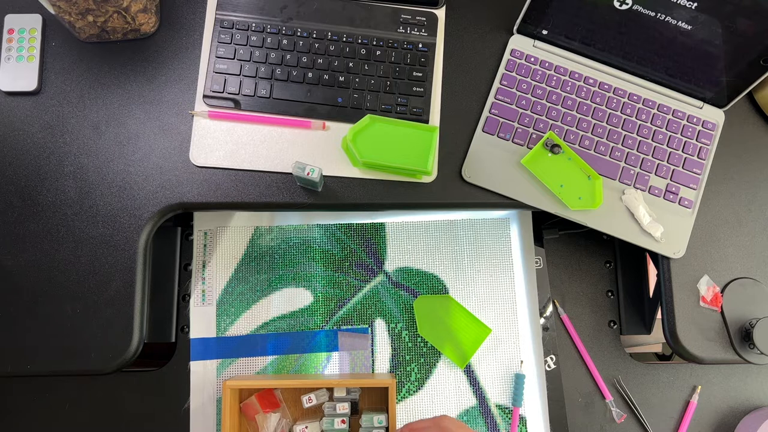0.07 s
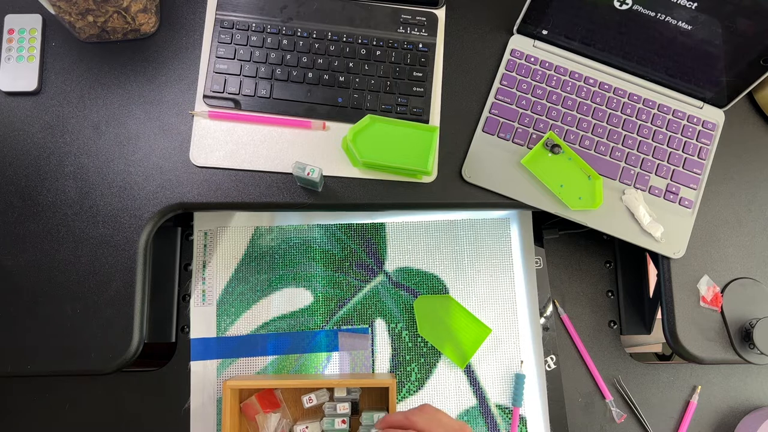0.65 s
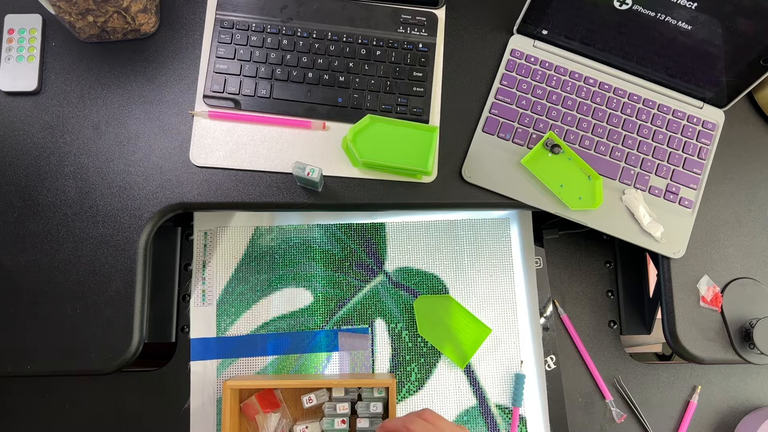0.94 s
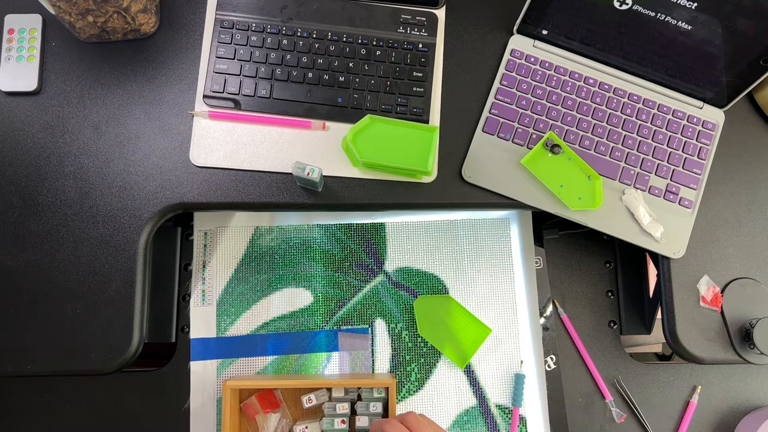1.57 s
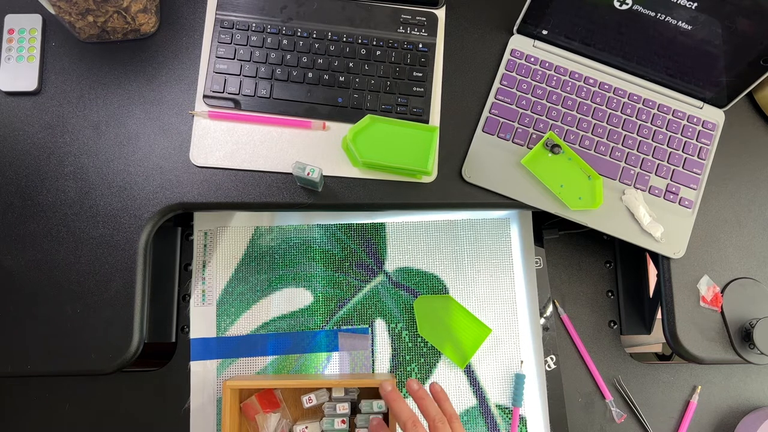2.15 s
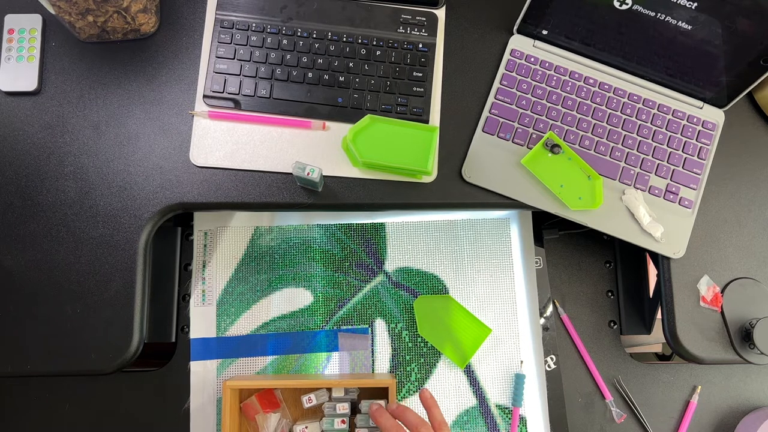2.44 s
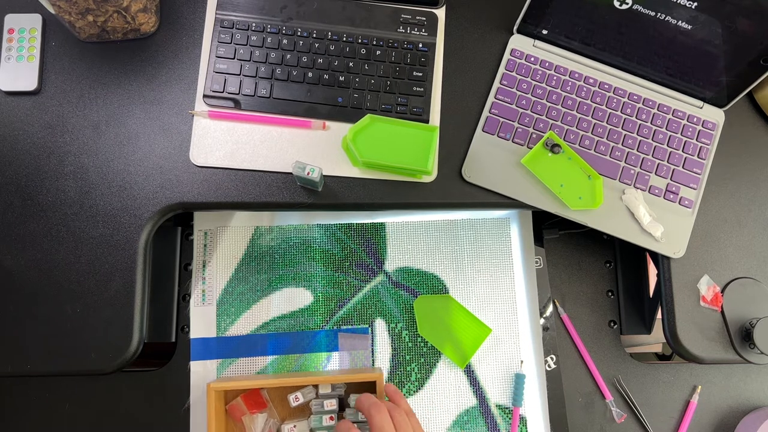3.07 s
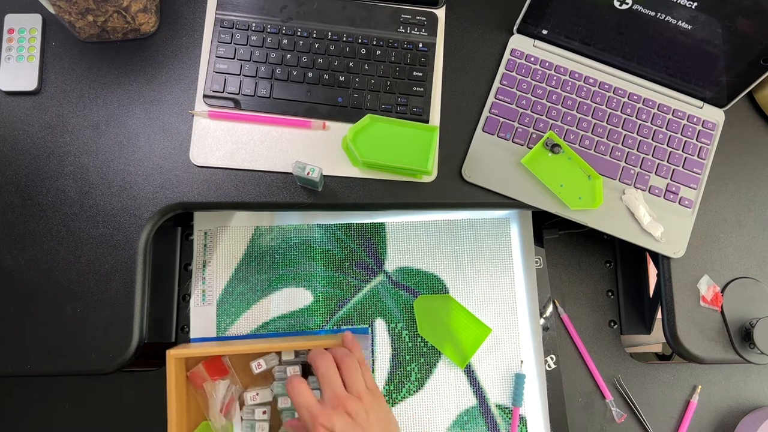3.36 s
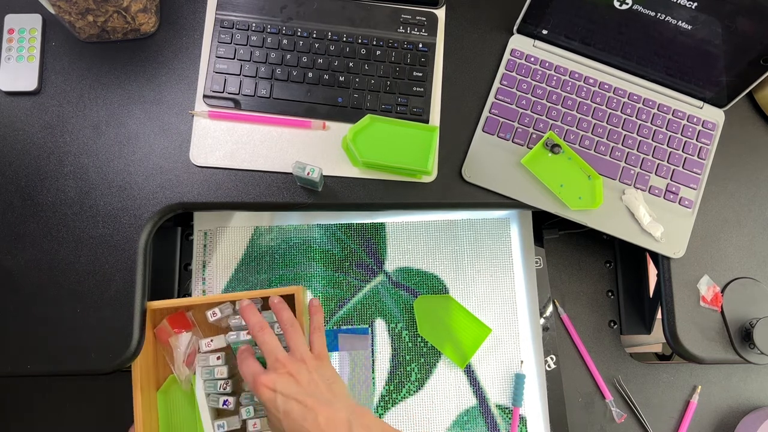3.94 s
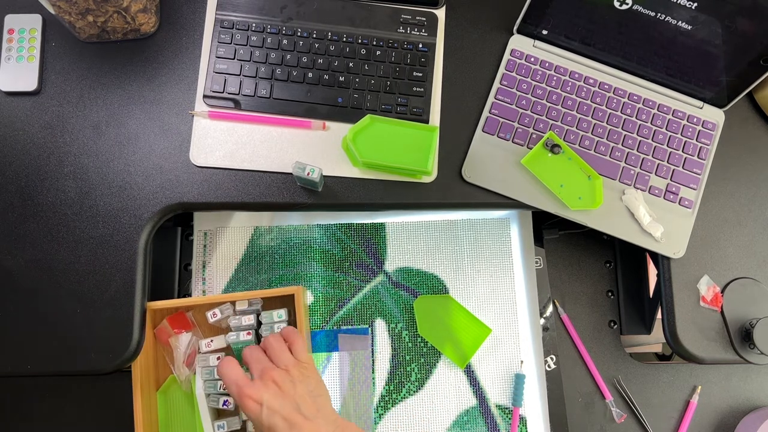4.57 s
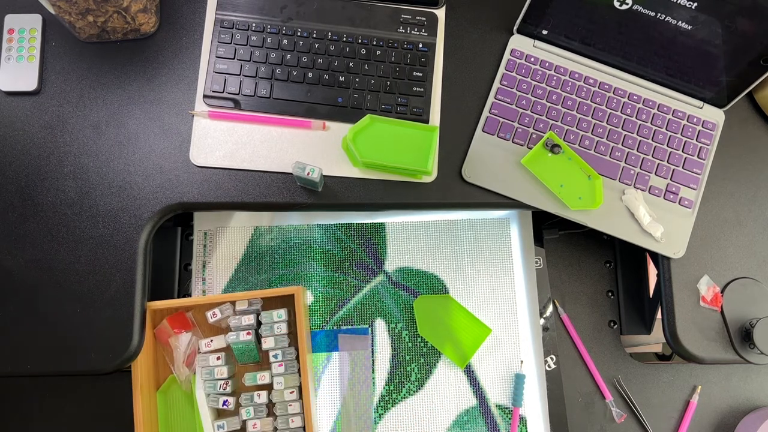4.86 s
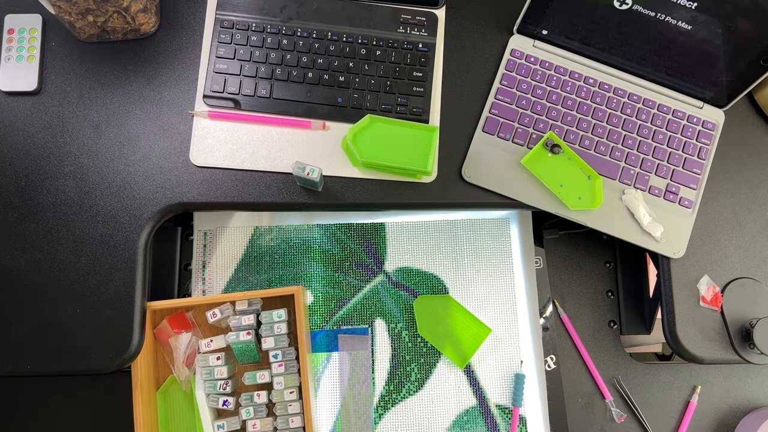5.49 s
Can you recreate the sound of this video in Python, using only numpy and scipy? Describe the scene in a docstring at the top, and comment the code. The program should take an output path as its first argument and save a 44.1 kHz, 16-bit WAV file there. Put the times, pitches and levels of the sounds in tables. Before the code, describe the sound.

Small plastic boxes are handled in a wooden tray on a desk, heard close up. A few faint ticks open, then a sharp cluster of dry knocks comes at about 0.8 seconds. More clicks and short scrapes follow, with a loud knock near 1.5 seconds. Lighter clicks come around 2.1 seconds and a firmer clatter at 2.7. From 3.2 seconds the boxes knock and rattle more busily. Between 3.7 and 3.9 the tray drags with a brief low groan and lands with a hollow bump. Scattered clicks continue until another loud knock at 4.6 seconds. From 4.8 to 5.1, fingertips press the boxes down with five light, dull taps, followed by one small crisp click. Fingers brush very faintly on the wood from about two seconds onward. A short small-room tail and a faint, steady low room tone lie behind everything.

```python
"""On a desk in a small room, a wooden tray full of small plastic bead boxes is pulled along, heard close up.
The boxes knock and chatter with a snap of thin walls, and stick and slip as they scrape past each other.
The tray groans as it drags and lands with a hollow bump; fingers brush the wood and press the boxes
into their rows with light, dull taps. A short room tail and a faint, steady room tone lie behind it."""
import sys
import numpy as np
from scipy import signal
from scipy.fft import rfft, irfft, next_fast_len
from scipy.io import wavfile

SR = 44100
rng = np.random.default_rng(int(sys.argv[2]) if len(sys.argv) > 2 else 0)


def unload_audio(sound):
    """Save the sound as a 16-bit wav file, at the path given as the first command line argument."""
    columns = np.transpose(np.atleast_2d(sound))
    # keep every value between -1 and 1, then stretch to whole-number steps
    steps = np.round(np.clip(columns, -1, 1) * 32767)
    wavfile.write(sys.argv[1], SR, steps.astype(np.int16))


N = 247842
HIT_SIZE, ATTACK_SIZE = int(.12 * SR), int(.008 * SR)
MEDIUM_DB, HARD_DB = -40, -26   # levels of a medium and a hard knock

# bright snap of the thin plastic walls: (frequency [Hz], level [dB])
WALL_SNAP = [(1800, -13.5), (2800, 2.5), (3900, 1), (5000, -3), (6500, -11.5), (9000, -23.5), (16000, -58)]
# crisp tick of the hard corners: (frequency [Hz], level [dB])
CORNER_TICK = [(4000, -26.5), (7000, 0), (8500, 0.5), (10000, -5.5), (12000, 1.5), (16000, -5.5)]
# soft hiss of rubbed wood: (frequency [Hz], level [dB])
WOOD_HISS = [(1000, -2.5), (2500, -1.5), (3500, -0.5), (4200, -3.5), (5000, -4.5), (6200, -10), (7700, -5),
             (9500, -10), (12000, -7.5), (16000, -12)]


def box_knocks(medium_chatter_ms=1.9, halving_db=18.5):
    """Boxes knock together: firm hits are crisp, light ones chatter for longer."""
    # (time [s], level [dB], pitch [Hz], wall snap [dB re level], corner tick [dB re level])
    knocks = [(0.185, -46, 1600, -25, -38), (0.196, -48.5, 1890, -10, -12), (0.2357, -55, 1490, -3, -11),
              (0.2938, -50.5, 1630, -4.5, -10), (0.3023, -48.5, 1350, -8, -14),
              (0.7653, -48.5, 950, -25, -28), (0.8161, -26, 1210, -13.5, -20),
              (0.8325, -26, 1630, -4, -16.5), (0.841, -24, 1600, -12, -16.5),
              (0.8511, -37.5, 1480, -3.5, -14), (1.0712, -49, 1400, -10, -16),
              (1.0914, -38.5, 1220, -16, -11.5), (1.215, -28, 1200, -7, -18.5),
              (1.2182, -29.5, 1190, -13, -35), (1.252, -45, 1400, -2, -21), (1.333, -49, 1770, -8.5, -20),
              (1.4015, -40.5, 1250, -12.5, -21.5), (1.4629, -33.5, 1630, -8, -27),
              (1.4733, -32, 1690, -1, -10), (1.484, -17.5, 1420, -7.5, -20.5), (2.063, -54, 1240, -10, -23),
              (2.1, -42.5, 1670, -2.5, -3), (2.1114, -42.5, 1360, -9, -5), (2.167, -51.5, 1450, -6, -8.5),
              (2.4427, -50, 1476, -2, -7), (2.6753, -38.5, 1520, -9, -18), (2.6805, -38, 1500, -19, -21),
              (2.684, -31, 1600, -14, -23), (2.7316, -31.5, 1700, -8, -23.5),
              (2.864, -45.5, 1450, -11, -10.5), (2.9416, -49.5, 1500, 1, -6), (2.9517, -41, 1320, -24, -22),
              (2.9681, -55.5, 1470, -2, 1), (2.984, -40.5, 1180, -10, -15),
              (3.0462, -39.5, 1340, -10, -19.5), (3.2441, -43.5, 1590, -4, -15.5),
              (3.2794, -34, 1300, -18, -27), (3.391, -48, 1390, -15, -25), (3.4354, -33, 1270, -41, -49),
              (3.4768, -40, 1260, -11.5, -24.5), (3.5318, -27, 1374, -19, -35),
              (3.549, -48, 1440, 6.5, -17), (3.6305, -26.5, 1316, -11, -23),
              (3.7528, -28.5, 1220, -15.5, -39), (3.769, -37, 1350, -22.5, -26),
              (3.8421, -28.5, 1470, -35, -31), (3.855, -27.5, 1400, -19.5, -36),
              (3.8737, -39, 1500, -19, -18), (3.9045, -32, 1330, -10.5, -34), (3.9345, -30, 1500, -12, -26),
              (3.9843, -57, 1580, 1.5, -6.5), (4.0151, -47.5, 1670, -27, -22),
              (4.0464, -29.5, 1480, -14, -49), (4.1239, -43.5, 1300, -7.5, -8),
              (4.208, -51.5, 1280, -3, -34), (4.3241, -45, 1550, -8, -29), (4.3412, -33, 1120, -5, -20.5),
              (4.3504, -40.5, 1670, -11, -24), (4.4694, -32.5, 1630, -15, -41.5),
              (4.5875, -43.5, 1090, -15, -14), (4.6094, -42, 1400, -2.5, -19.5),
              (4.6175, -19.5, 1270, -21, -33.5), (5.2104, -42, 1940, 1, -9), (5.4802, -61.5, 1664, -3, -7)]
    out = np.zeros(N)
    for s, db, pitch_hz, snap_db, tick_db in knocks:
        chatter_ms = medium_chatter_ms * .5 ** ((db - MEDIUM_DB) / halving_db)
        add(out, s, box_contact(db, pitch_hz, snap_db, tick_db, chatter_ms) + tray_thump(s, db))
    return out


def box_contact(db, pitch_hz, snap_db, tick_db, chatter_ms, knock_ms=.8, snap_ms=2.2, tick_ms=4.0,
                ring_db=-1.0, lid_db=-6.0):
    """A dry knock, damped by the neighbours, with a weaker ring, a snap of the walls and a corner tick."""
    # ring of the thin lids and walls: (frequency [Hz], level [dB], t60 [s])
    lid_modes = [(2578, -0.5, 0.053), (2825, 0.5, 0.05), (2960, -7, 0.0092), (3662, -1, 0.038),
                 (3826, 0, 0.033), (4370, 5, 0.022), (4540, -6, 0.018), (5400, -10.5, 0.022)]
    low_cut = signal.butter(2, 540, "high", fs=SR, output="sos")   # a small box has little bass
    octaves = .93 + .06 * max(db - HARD_DB, 0)   # the hardest blows excite a wider band
    force = burst(knock_ms + chatter_ms, rise_ms=0.71)
    knock = unit_hit(signal.sosfilt(low_cut, around_pitch(force, pitch_hz, octaves)))
    body = knock + from_db(ring_db) * unit_hit(box_ring(force, pitch_hz, octaves))
    walls = unit_hit(colour(burst(snap_ms + .5 * chatter_ms), WALL_SNAP))
    snap = walls + from_db(lid_db) * unit_hit(struck_plastic(force, lid_modes, vary_db=1.5))
    tick = colour(burst(tick_ms + .5 * chatter_ms), CORNER_TICK)
    hit = unit_hit(body) + from_db(snap_db) * unit_hit(snap) + from_db(tick_db) * unit_hit(tick)
    return from_db(db) * hit


def box_ring(force, pitch_hz, octaves=1.4):
    """The spot that is touched favours the modes around one pitch."""
    # ring of the boxes packed in the tray: (frequency [Hz], level [dB], t60 [s])
    box_modes = [(695, 0.5, 0.059), (779, 5, 0.038), (910, 0.5, 0.036), (987, 2.5, 0.032),
                 (1137, -11, 0.0057), (1316, -7.5, 0.094), (1519, 0, 0.029), (1530, -6.5, 0.014),
                 (1796, -2, 0.05), (2087, -0.5, 0.052), (2327, -1, 0.063), (2502, -6, 0.075)]
    return around_pitch(struck_plastic(force, box_modes, vary_db=2.0), pitch_hz, octaves)


def struck_plastic(force, modes, vary_db, detune=0.0036):
    """No two boxes are tuned quite alike, and each is hit on another spot."""
    modes = np.array(modes, float)
    modes[:, 0] *= np.exp(detune * rng.standard_normal(len(modes)))
    strengths = from_db(vary_db * rng.standard_normal(len(modes))) * rng.choice([-1, 1], len(modes))
    return ring(force, modes, strengths)


def finger_taps():
    """Fingertips press the boxes home, each with a soft, dull contact."""
    # (time [s], level [dB])
    taps = [(4.795, -37.5), (4.8846, -42), (4.9888, -43), (5.0525, -43), (5.125, -44)]
    out = np.zeros(N)
    for s, db in taps:
        tap = box_contact(db, pitch_hz=1340, snap_db=-26, tick_db=-44, chatter_ms=1)
        add(out, s, tap + tray_thump(s, db))
    return out


def box_slides():
    """Boxes slide along each other in short scrapes that swell or fade evenly."""
    # (start [s], end [s], start level [dB], end level [dB], pitch [Hz], rasp [dB re level])
    slides = [(0.506, 0.561, -70.5, -60.5, 1880, -3.5), (0.797, .817, -55, -50, 1400, -10),
              (1.221, 1.244, -37, -53, 1180, -16), (1.337, 1.414, -43.5, -53, 1910, -3.5),
              (1.415, 1.442, -57, -57, 1060, -5), (1.442, 1.473, -47, -39.5, 1450, -2.5),
              (1.486, 1.504, -33.5, -33, 1100, -14), (1.944, 2.009, -67.5, -70.5, 1630, -3),
              (2.097, 2.11, -45, -51, 1400, -4), (2.674, 2.729, -43, -46, 1940, -3.5),
              (2.882, 2.905, -60, -55, 1510, -13), (2.944, 2.988, -60, -50, 1400, -6),
              (3.117, 3.23, -68.5, -61, 1330, -10.5), (3.489, 3.571, -54, -52.5, 1470, -16),
              (3.617, 3.625, -53, -57, 1550, 5.5), (4.207, 4.24, -61, -53.5, 1770, -14),
              (4.269, 4.344, -69.5, -76, 1660, 7), (4.464, 4.465, -62, -68, 1600, -6)]
    out = np.zeros(N)
    for start, end, start_db, end_db, pitch_hz, rasp_db in slides:
        size = max(int((end - start) * SR), ATTACK_SIZE)
        pressure = from_db(np.linspace(start_db, end_db, size))
        add(out, start, scrape(pressure, pitch_hz, rasp_db, boom_db=-17.5))
    return out


def scrape(pressure, pitch_hz, rasp_db, boom_db, ring_db=-2.5, rub_db=-0.5, grit_db=-11, puff_s=0.0018):
    """Slips ring the boxes and the tray, and each leaves a short puff of friction noise."""
    force = stick_slip(pressure)
    puff_power = signal.lfilter([1], [1, -np.exp(-1 / (puff_s * SR))], force ** 2 + 1e-18)
    friction = np.sqrt(puff_power) * rng.standard_normal(len(force))
    layers = [(ring_db, box_ring(force, pitch_hz)),
              (rub_db, bandpass(friction, .6 * pitch_hz, 1.5 * pitch_hz)),
              (boom_db, tray_boom(force)),
              (rasp_db, colour(friction, WALL_SNAP)),
              (rasp_db + grit_db, colour(friction, CORNER_TICK))]
    return pressure.mean() * sum(from_db(db) * unit_rms(layer, len(pressure)) for db, layer in layers)


def stick_slip(pressure, slips_per_s=2000, uneven_db=3.0):
    """Sticking and slipping makes a dense, uneven train of tiny blows."""
    size = len(pressure)
    slips = (rng.random(size) < slips_per_s / SR) * rng.choice([-1, 1], size)
    force = slips * pressure * from_db(uneven_db * rng.standard_normal(size))
    return np.pad(force, (0, HIT_SIZE))   # time to ring out


def tray_drag(hiss_db=-14, hiss_follows=0.82):
    """The dragged tray groans on its strongest modes and hisses on the desk; the boxes rattle inside."""
    # (time [s], groan level [dB], rattle level [dB])
    drag_levels = [(3.69, -54.5, -45), (3.694, -37, -45.5), (3.738, -55, -45), (3.76, -54, -44),
                   (3.84, -53, -41.5), (3.855, -34.5, -33.5), (3.872, -34.5, -38), (3.884, -59, -48),
                   (3.935, -53, -54)]
    s, groan_db, rattle_db = np.transpose(drag_levels)
    t = np.arange(s[0], s[-1], 1 / SR)
    grip, shaking = from_db(np.interp(t, s, groan_db)), from_db(np.interp(t, s, rattle_db))
    groan = tray_boom(stick_slip(grip), vary_db=1.0, low_hz=306, high_hz=467)
    out = np.zeros(N)
    add(out, s[0], grip.mean() * unit_rms(groan, len(t)))
    add(out, s[0], scrape(shaking, pitch_hz=1460, rasp_db=-16, boom_db=-10))
    hiss = unit_rms(colour(rng.standard_normal(len(t)), WOOD_HISS) * shaking ** hiss_follows)
    add(out, s[0], from_db(hiss_db) * shaking.mean() * hiss)
    return out


def tray_bumps(contact_ms=1.7, grind_db=-5, grind_ms=6.8):
    """The tray's base meets the desk with one soft push and grinds briefly."""
    # (time [s], level [dB])
    bumps = [(0.8324, -44.5), (1.0916, -50.5), (1.335, -56), (1.4837, -46.5), (2.169, -60), (2.6597, -57),
             (3.692, -51), (3.854, -30.5), (3.9044, -46), (4.1237, -56.5), (4.3421, -52)]
    ms = np.arange(HIT_SIZE) / SR * 1e3
    push = np.sin(np.pi * np.minimum(ms / contact_ms, 1))
    out = np.zeros(N)
    for s, db in bumps:
        knock = unit_hit(tray_boom(push, vary_db=2.0, low_hz=241, high_hz=860))
        grind = from_db(grind_db) * unit_hit(tray_boom(burst(grind_ms)))
        add(out, s, from_db(db) * (knock + grind))
    return out


def tray_thump(s, knock_db, medium_thump_db=-62, share=0.36, spread_ms=6.1, lift_s=3.26, down_s=3.68):
    """The wood answers a knock more slowly and takes only a share of its extra strength."""
    level_db = medium_thump_db + share * (knock_db - MEDIUM_DB)
    if lift_s < s < down_s:   # held clear of the desk, the tray hardly thumps
        level_db -= 18
    return from_db(level_db) * unit_hit(tray_boom(burst(spread_ms)))


def tray_boom(force, vary_db=4.0, low_hz=170, high_hz=900):
    """The wooden tray booms under the boxes; it is too small to radiate deep bass."""
    # hollow ring of the tray on the desk: (frequency [Hz], level [dB], t60 [s])
    tray_modes = [(171.8, -20, 0.029), (215, -14.5, 0.13), (233, -11.5, 0.12), (306, -5.5, 0.094),
                  (361, -1, 0.076), (426, -4, 0.049), (495, 0.5, 0.028), (541, -1.5, 0.086),
                  (690, -7.5, 0.092)]
    strengths = from_db(vary_db * rng.standard_normal(len(tray_modes)))
    return bandpass(ring(force, tray_modes, strengths), low_hz, high_hz)


def finger_strokes(patchy_db=2.0, patch_s=0.016, rub_db=-3, rub_octaves=0.53):
    """Skin on wood catches unevenly; each stroke is one soft swell of hiss with a thin rub in it."""
    # (middle [s], length [s], level [dB], rub pitch [Hz])
    strokes = [(2.164, .36, -69.5, 5000), (2.41, 0.16, -72.5, 7600), (2.625, 0.22, -67, 5200),
               (2.92, 0.47, -75, 7500), (3.65, 0.56, -67.5, 4400), (4.176, 0.56, -72.5, 4950),
               (5.08, 0.35, -69.5, 3520), (5.384, 0.071, -73, 6920), (5.593, 0.071, -67, 7560)]
    t = np.arange(N) / SR
    hiss = unit_rms(colour(rng.standard_normal(N), WOOD_HISS))
    white = rng.standard_normal(N)
    patches = np.interp(t / patch_s, np.arange(SR), rng.standard_normal(SR))
    out = np.zeros(N)
    for s, length_s, db, rub_hz in strokes:
        during = np.abs(t - s) < length_s / 2
        swell = np.cos(np.pi * (t[during] - s) / length_s)
        rub = from_db(rub_db) * unit_rms(around_pitch(white[during], rub_hz, rub_octaves))
        out[during] += from_db(db) * swell * (hiss[during] + rub)
    return out * from_db(patchy_db * patches)


def small_room(x, scatter_db=-11.0, scatter_ms=21.5, build_s=0.012, wall_s=0.02, wall_db=-17):
    """Scatter from the things on the desk, one wall echo, and a tail that lasts longest in the mids."""
    # colour of the tail: (frequency [Hz], level [dB])
    tail_colour = [(150, 0), (400, -5.5), (900, -12.5), (1800, -14), (4000, -15), (8000, -11),
                   (15000, -14.5)]
    # decay of the tail: (frequency [Hz], t60 [s])
    tail_t60 = [(150, 0.074), (500, .33), (1200, 0.34), (2500, 0.33), (5000, 0.15), (10000, 0.12),
                (16000, .16)]
    t = np.arange(SR // 2) / SR
    edges_hz = np.geomspace(100, 17000, 13)
    response = np.zeros(len(t))
    for low, high in zip(edges_hz, edges_hz[1:]):
        hz = np.sqrt(low * high)
        band = bandpass(rng.standard_normal(len(t)), low, high)
        tail = band * from_db(-60 * t / at_hz(tail_t60, hz)) * (1 - np.exp(-t / build_s))
        gain = from_db(at_hz(tail_colour, hz)) * np.sqrt(2 * (high - low) / SR)
        response += gain * tail / np.linalg.norm(tail)
    add(response, .003, from_db(scatter_db) * burst(scatter_ms))
    add(response, wall_s, from_db(wall_db) * burst(decay_ms=0.91))
    return x + signal.fftconvolve(x, response)[:N]


def room_tone(level_db=-65.5):
    """A steady low rumble with a trace of hiss."""
    # (frequency [Hz], relative level [dB])
    tone_colour = [(25, -12), (45, -1), (70, -3), (105, -2), (150, -16), (320, -18), (680, -23),
                   (1500, -25.5), (3000, -30), (5000, -33.5), (7500, -35), (9500, -41), (12000, -33.5),
                   (16000, -41.5)]
    return from_db(level_db) * unit_rms(colour(rng.standard_normal(N), tone_colour))


def burst(decay_ms, rise_ms=0.36):
    """A quickly swelling, dying cluster of micro-contacts: all frequencies alike, unit energy."""
    ms = np.arange(HIT_SIZE) / SR * 1e3
    envelope = np.exp(-ms / decay_ms) * (1 - np.exp(-ms / rise_ms))
    phases = np.angle(rfft(rng.standard_normal(HIT_SIZE) * envelope))
    flat = irfft(np.exp(1j * phases), HIT_SIZE)
    cluster = flat * np.exp(-(ms / (5 * decay_ms)) ** 2)
    return cluster / np.linalg.norm(cluster)


def ring(force, modes, strengths):
    """A force sets decaying sines ringing, each with its own strength."""
    out = 0
    for (hz, db, t60), strength in zip(modes, strengths):
        radius, angle = from_db(-60 / (t60 * SR)), 2 * np.pi * hz / SR
        feedback = [1, -2 * radius * np.cos(angle), radius * radius]
        out = out + strength * from_db(db) * signal.lfilter([1, 0, -1], feedback, force + 1e-18)
    return out


def colour(x, spectrum):
    """Minimum-phase EQ: shapes the tone with no ringing ahead of the attack."""
    n = 2 * next_fast_len(len(x))
    hz = np.arange(n // 2 + 1) * SR / n
    cepstrum = irfft(np.log(from_db(at_hz(spectrum, hz))))
    cepstrum[1:n // 2] *= 2
    cepstrum[n // 2 + 1:] = 0
    return irfft(rfft(x, n) * np.exp(rfft(cepstrum)))[:len(x)]


def around_pitch(x, pitch_hz, octaves):
    """Keep a band of some octaves around a pitch."""
    edge_ratio = 2 ** (np.clip(octaves, .3, 2.5) / 2)
    return bandpass(x, pitch_hz / edge_ratio, pitch_hz * edge_ratio)


def bandpass(x, low_hz, high_hz):
    """Roll off gently on both sides of a band."""
    return signal.sosfilt(signal.butter(2, [low_hz, high_hz], "band", fs=SR, output="sos"), x)


def at_hz(points, hz):
    """Read a table on a log-frequency axis."""
    frequencies, values = np.transpose(points)
    return np.interp(np.log(np.maximum(hz, 1)), np.log(frequencies), values)


def unit_hit(x):
    """Scale a hit to the energy of rms 1 held for the length of an attack."""
    return x * np.sqrt(ATTACK_SIZE) / np.linalg.norm(x)


def unit_rms(x, size=None):
    """Scale so that the first `size` samples have rms 1."""
    return x / np.sqrt(np.mean(x[:size] ** 2) + 1e-20)


def from_db(db):
    """Decibels to gain."""
    return 10 ** (np.asarray(db) / 20)


def add(out, s, sound):
    """Mix a sound in at time s."""
    i = int(s * SR)
    out[i:i + len(sound)] += sound[:N - i]


def scene():
    """Boxes and tray sound in the room, with dry finger strokes and room tone beneath, in mono."""
    background = room_tone()
    handling = box_knocks() + finger_taps() + box_slides() + tray_drag() + tray_bumps()
    return (small_room(handling) + finger_strokes() + background)[None]


def record(dry, cutoff_hz=16200):
    """A steep low-pass takes off the very top."""
    return signal.sosfilt(signal.ellip(10, .1, 70, cutoff_hz, fs=SR, output="sos"), dry)


dry = scene()
out = record(dry)
unload_audio(out)
```